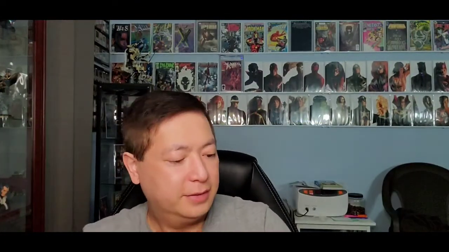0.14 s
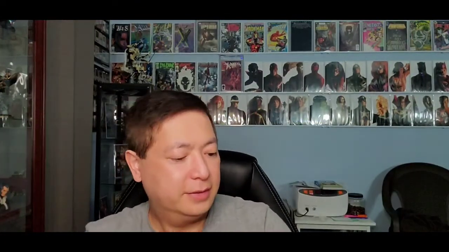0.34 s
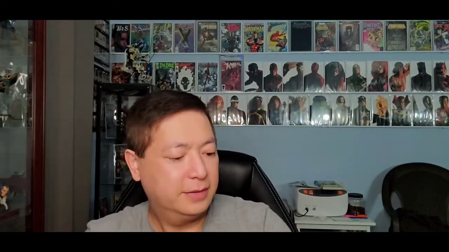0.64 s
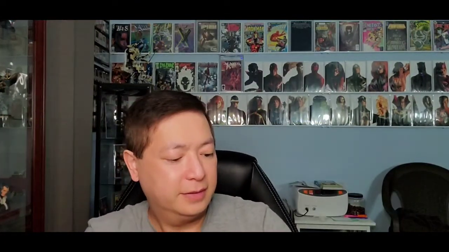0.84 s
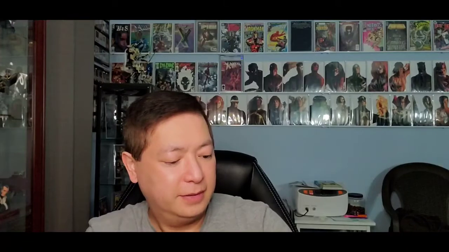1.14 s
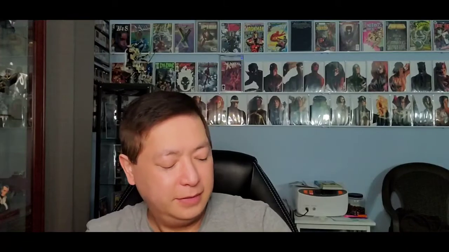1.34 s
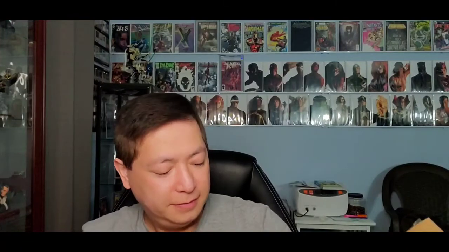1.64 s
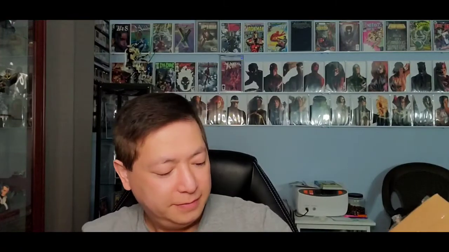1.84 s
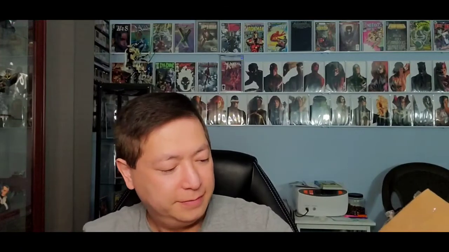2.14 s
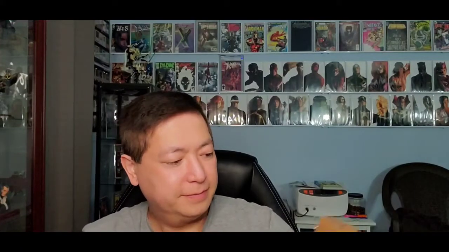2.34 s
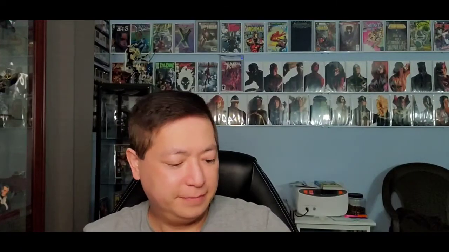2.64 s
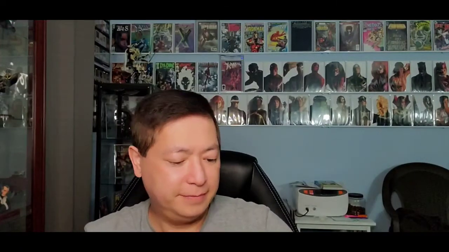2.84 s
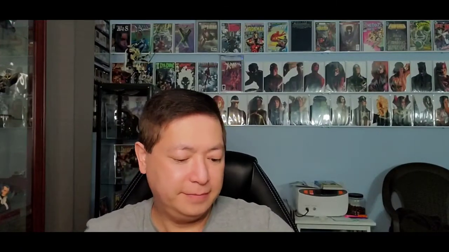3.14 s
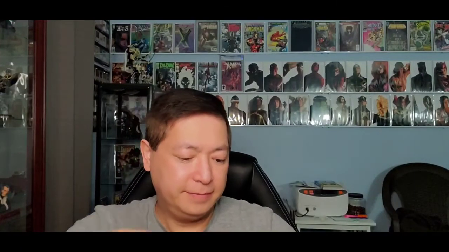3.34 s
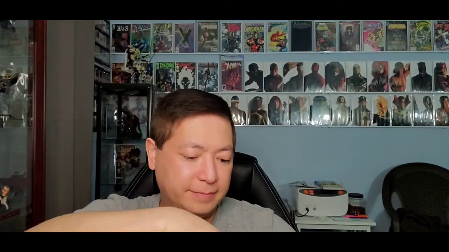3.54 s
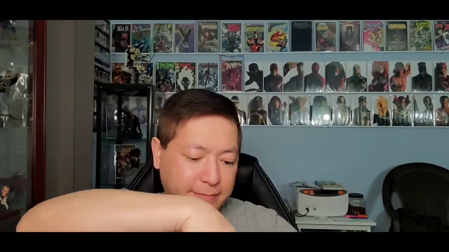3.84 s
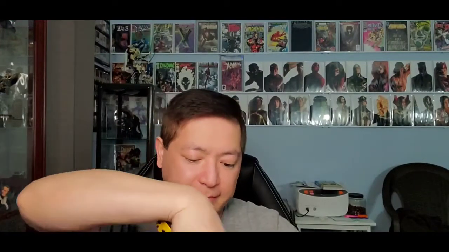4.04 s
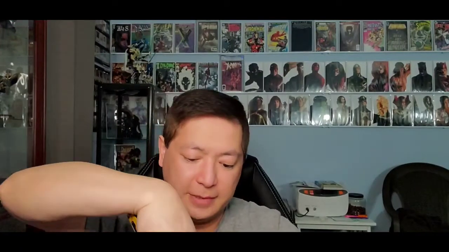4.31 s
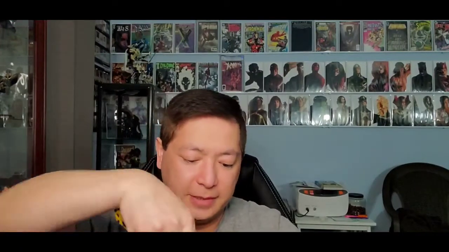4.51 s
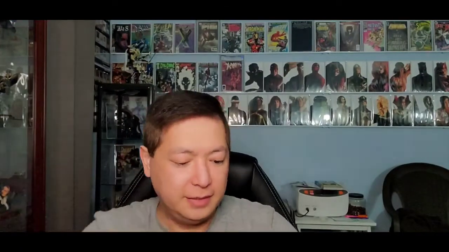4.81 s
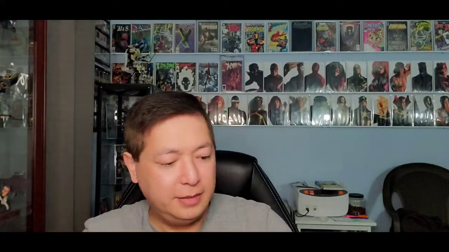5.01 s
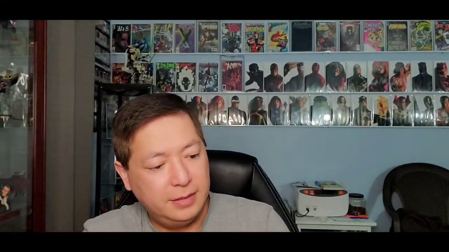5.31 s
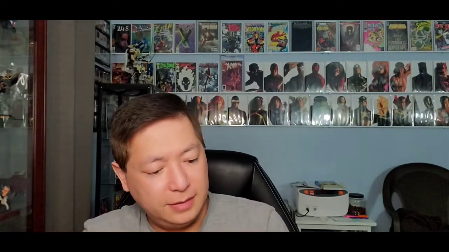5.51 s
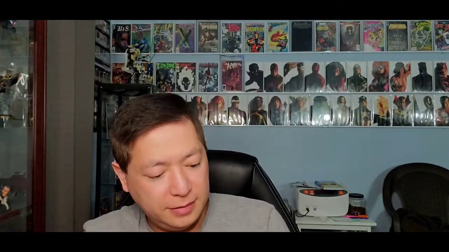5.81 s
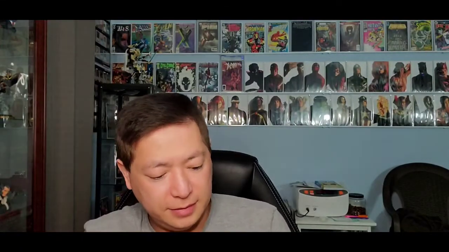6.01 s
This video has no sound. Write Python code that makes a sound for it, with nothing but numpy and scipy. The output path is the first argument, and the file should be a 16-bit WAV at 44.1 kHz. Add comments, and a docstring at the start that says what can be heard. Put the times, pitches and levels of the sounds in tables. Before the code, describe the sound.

Close, irregular scraping and snapping as a blade works through tape on a cardboard box, with short pauses over a low rumble.

```python
"""Cutting the tape on a box

A blade is worked through packing tape on a cardboard box, near two microphones in a quiet room.
Tape and blade snap and knock, so the card rings and the hollow box thumps. In between, blade and
hands rub and rasp as fibres catch and let go, and twice the tape slips with a squeak.
A low rumble and a faint hiss lie underneath."""
import sys
import numpy as np
from scipy import signal
from scipy.fft import rfft, irfft, next_fast_len
from scipy.io import wavfile

SR = 44100
rng = np.random.default_rng(int(sys.argv[2]) if len(sys.argv) > 2 else 0)


def pcm_store(signal):
    """Save signal as 16-bit PCM."""
    levels = np.round(np.clip(np.atleast_2d(signal), -1, 1) * 32767)
    wavfile.write(sys.argv[1], SR, levels.astype(np.int16).T)


N = 272004

# Tone of the rumble and hiss: (frequency [Hz], relative level [dB])
BACKGROUND_TONE = [(20, -25), (30, -23.5), (40, -10), (58, 4.5), (87, -14), (125, -18.5), (155, -14.5),
                   (217, -25.5), (280, -28), (384, -40.5), (1000, -47.5), (3000, -55), (7000, -64.5),
                   (10000, -61), (16000, -58)]
# How much the background differs between left and right: (frequency [Hz], unshared over shared [dB])
BACKGROUND_WIDTH = [(60, -19), (300, -13), (1000, -5), (4000, -1), (12000, -1)]
# Snaps and knocks; cavity, panel and film count from the flap's peak, the aftersound from each part's:
# (time [s], flap peak [dB], cavity [dB], panel [dB], film [dB], aftersound [dB], decay time [s],
# panel pitch [Hz])
SNAPS = [(0.231, -69.5, 16, 6.5, -2, -14, 0.51, 530), (0.369, -55, 5.5, -3.5, 12.5, -11, 0.37, 640),
         (0.628, -47.5, -7, -5.5, 12, -18.5, 0.47, 1310), (0.815, -51.5, -25, -15, 3, -16.5, 0.64, 622),
         (1.03, -36.5, -15, -10, 8, -17, 0.23, 625), (1.091, -28.5, -3.5, -8, 2.5, -15.5, 0.39, 660),
         (1.12, -38.5, 0, -7, 9, -8, 0.16, 1280), (1.376, -39, 1, 0.5, 0.5, -25, 0.49, 680),
         (2.055, -54.5, -4, -17, 12, -20.5, 0.18, 528), (2.075, -32.5, 0.5, -1, -1, -15, 0.47, 1250),
         (2.201, -34, 3, 5.5, -3, -15.5, 0.25, 770), (2.287, -47, 0.5, -1.5, -8, -24, 0.49, 507),
         (2.566, -69, -16, 5, -3, -11.5, 0.69, 1360), (2.61, -66.5, 13, -5, -2, -13, 0.85, 595),
         (2.688, -54, 11, -0.5, 14.5, -12.5, 0.36, 535), (2.719, -52, 0, -10, 1, -14.5, 0.32, 1300),
         (2.779, -54, -10, -9, 8.5, -13, 0.19, 1140), (2.845, -51, -10, -4, 1.5, -9.5, 0.33, 1430),
         (2.881, -53, -25, -4, 17.5, -23, 0.18, 711), (2.936, -33, -14, -4.5, -2, -19, 0.29, 1420),
         (3.127, -53.5, 6, 1, -1, -7, 0.44, 600), (3.169, -25.5, 1.5, 3.5, -10, -15.5, 0.29, 1130),
         (3.695, -43, 7.5, 0.5, -3, -13.5, 0.36, 844), (3.763, -51.5, -18, -26, 14, -21, 0.31, 740),
         (3.797, -47, -1, -17, 1, -24, 0.32, 452), (3.815, -41.5, 10.5, -35, -3.5, -11, 0.17, 452),
         (3.927, -56.5, 17.5, 7, -13, -13, 0.54, 516), (4.08, -37, -29, -22, 2.5, -9, 0.32, 1450),
         (4.093, -35.5, -27, 1.5, -3, -10, 0.56, 574), (4.109, -13, -9.5, -10, 1.5, -21, 0.29, 1370),
         (4.257, -23.5, -20.5, -16.5, -3, -22.5, 0.28, 1380), (4.418, -28.5, 2.5, -10, -1, -9, 0.29, 530),
         (4.448, -25, -2.5, -2, -14, -15, 0.34, 1070), (4.557, -40.5, -9, -15, 4.5, -35, 0.12, 953),
         (4.614, -57.5, 6.5, 5.5, -1, -7, 0.15, 779), (4.641, -48.5, -6, -2, -38, -22, 0.94, 1090),
         (4.762, -71, 13.5, -21, 20.5, -12, 0.93, 842), (5.017, -40.5, 0.5, 0, -1, -15.5, 0.66, 900),
         (5.151, -54, 11.5, 14, -9, -8.5, 0.32, 450), (5.241, -43, 5, -0.5, 6, -6, 0.21, 816),
         (5.356, -45, -6, 5, 1, -5.5, 0.29, 600), (5.379, -35, 7, 5.5, -13, -10.5, 0.26, 600),
         (5.437, -38.5, 5.5, 12.5, -16, -10.5, 0.22, 680), (5.467, -39.5, 6, 5, 4.5, -16.5, 0.26, 603),
         (5.641, -27, -8.5, 5.5, -20, -13.5, 0.34, 800), (5.793, -34.5, -26, 0, -14, -10.5, 0.27, 1330),
         (5.883, -42.5, 1, 8.5, -22, -17, 0.23, 800), (5.998, -36.5, -12, -5, -0.5, -17, 0.35, 1290),
         (6.122, -50.5, -19, 3.5, -7, -12, 1, 595)]
# Stereo width of a snap's aftersound: (flap [ratio], film [ratio], panel [ratio], cavity [ratio])
AFTERSOUND_WIDTH = (.7, .6, .55, .12)
# Modes are the pitches at which a part likes to ring: (pitch [Hz], width [Hz], level [dB])
FLAP_MODES = [(1850, 252, 5.5), (2040, 426, 2), (2600, 510, -1), (3100, 237, 1), (3800, 540, -4),
              (4400, 156, 3), (4690, 1400, -3)]   # blade and flap
FILM_MODES = [(5630, 660, -12.5), (9750, 1330, 4.5), (10680, 2800, 1.5), (14340, 4800, -5),
              (13600, 2500, -27)]   # tape film
PANEL_MODES = [(438, 19, 2.5), (530, 39, 2.5), (600, 34, 4), (680, 45, 2.5), (800, 65, 0.5),
               (1090, 148, -2.5), (1290, 71, 2), (1430, 81, -0.5)]   # card walls
CAVITY_MODES = [(88.7, 12.6, -10), (202.6, 41.2, -1), (258.8, 43.8, 1), (335.4, 75, -10.5)]   # desk and the air in the box
# Slow strokes of blade and hands:
# (firmest moment [s], build-up [s], let-go [s], panel [dB], cavity [dB], flap [dB], film [dB])
STROKES = [(0.668, 0.16, 0.092, -67, -58.5, -70.5, -81), (0.86, 0.072, .3, -60, -51.5, -59.5, -75),
           (1.0, 0.096, 0.29, -58, -66, -56.5, -58), (1.084, 0.072, 0.1, -36.5, -53, -43.5, -43.5),
           (1.239, 0.077, 0.23, -38.5, -66, -42, -52.5), (1.32, 0.13, 0.17, -58, -48.5, -59, -79),
           (1.58, .12, 0.056, -83, -84, -82, -76), (2.22, 0.1, 0.084, -85, -48.5, -68, -86),
           (2.7, 0.04, 0.17, -61, -68, -76, -90), (2.858, 0.059, .2, -65, -60, -62.5, -65),
           (2.974, 0.16, 0.13, -63.5, -61, -67, -65), (3.112, 0.062, 0.23, -80, -73, -66, -67),
           (3.183, 0.082, 0.13, -50.5, -63, -56, -55), (3.868, 0.079, 0.02, -95, -51.5, -80, -68),
           (3.95, 0.027, 0.26, -63, -58, -63, -58.5), (4.028, 0.1, 0.092, -53.5, -50.5, -49.5, -56),
           (4.144, 0.054, 0.092, -37.5, -38.5, -40.5, -40), (4.3, 0.31, 0.12, -64, -58.5, -57.5, -56),
           (4.444, 0.084, 0.12, -38.5, -52, -42, -44), (4.851, 0.16, 0.13, -61.5, -63.5, -58, -59.5),
           (5.08, 0.1, 0.33, -58, -86, -55.5, -51.5), (5.248, 0.23, 0.094, -56, -75, -51, -74),
           (5.35, 0.046, 0.33, -58.5, -46, -61, -65), (5.581, 0.077, 0.057, -58, -63, -66.5, -72),
           (5.742, 0.1, 0.14, -58, -47.5, -56, -59.5), (5.856, 0.26, 0.017, -49, -51, -70, -64.5),
           (6.044, 0.19, 0.12, -48, -50.5, -51, -58)]
# Short rasps of the blade tip: (middle [s], half length [s], panel [dB], cavity [dB], flap [dB],
# film [dB], panel pitch [Hz], flap pitch [Hz])
RASPS = [(0.656, 0.031, -58.5, -68, -74, -87, 1310, 1990), (0.573, 0.05, -70, -85, -82, -98, 1300, 2020),
         (0.73, 0.05, -72, -84, -66.5, -86, 1280, 2600), (0.891, 0.069, -45.5, -40.5, -56, -62, 1420, 3130),
         (1.093, 0.11, -40.5, -37, -46, -41, 603, 2810), (1.253, 0.16, -38, -50, -52, -67, 1090, 2600),
         (1.276, 0.15, -44.5, -40, -62, -59, 680, 3000), (1.355, 0.052, -40, -33, -57, -77, 704, 2600),
         (2.15, 0.073, -40.5, -47.5, -50, -74, 800, 3400), (2.316, 0.21, -71, -64, -68.5, -84, 1280, 1850),
         (2.643, 0.08, -69, -84, -65, -71, 1280, 3800), (4, 0.037, -67, -69, -58.5, -57, 800, 3100),
         (4.412, 0.093, -48, -62, -43.5, -63, 700, 3800), (4.424, 0.055, -38.5, -52, -61, -45, 800, 4400),
         (4.46, 0.017, -61, -49, -61, -44, 1180, 2000), (4.524, 0.064, -40, -42, -41, -43.5, 800, 3100),
         (4.851, 0.23, -61, -83, -55, -71, 800, 3350), (5.192, 0.04, -64, -67, -43.5, -46.5, 1300, 4060),
         (5.244, 0.038, -33, -64, -34.5, -39.5, 716, 4400), (5.301, 0.17, -64, -65, -65, -83, 1300, 4670),
         (5.448, 0.076, -34.5, -67, -55, -72, 740, 1950), (5.672, 0.079, -34.5, -47, -39, -50, 580, 1930),
         (5.701, 0.064, -62, -50, -35.5, -45, 704, 2780),
         (5.801, 0.089, -52.5, -47.5, -42.5, -48.5, 1170, 3420),
         (6.068, 0.34, -58.5, -56, -53.5, -74, 1190, 2330)]
# Slips of the tape: (start [s], length [s], first pitch [Hz], last pitch [Hz], level [dB])
SQUEAKS = [(4.645, 0.12, 1700, 2000, -62.5), (5.255, 0.074, 4800, 4340, -50)]
# How much louder the left microphone is: (frequency [Hz], left over right [dB])
LEFT_LOUDER = [(60, -1), (200, -1), (380, -2), (700, .7), (1300, 2.5), (2400, 2.8), (4400, 3.5),
               (6000, 2.5), (8000, -2.5), (10000, -3.5), (12500, 1.5), (15500, 2.5)]
# How far the nearer, left microphone is ahead: (frequency [Hz], phase [radians])
LEFT_AHEAD = [(100, .05), (500, .5), (1290, 1.15), (2400, 1.3), (4300, 1.75), (8500, 1.95), (12000, 1.55),
              (16000, 1.5)]
# How long the room's echo takes to fall by 60 dB: (frequency [Hz], time [s])
ROOM_DECAY = [(200, 0.18), (1000, 0.17), (4000, 0.14), (12000, 0.31)]


def amp(db):
    """Turn decibels into a number to multiply by."""
    return 10 ** (np.asarray(db) / 20)


def rms_one(x):
    """Scale a signal to an average strength (rms) of 1."""
    return x / np.sqrt(np.mean(x ** 2) + 1e-20)


def at_hz(table, hz):
    """Read between a table's rows, with octaves evenly spaced."""
    table_hz, values = np.transpose(table)
    return np.interp(np.log(hz + 1), np.log(table_hz), values)


def ring(x, modes):
    """Let x shake a part of the box: every mode rings, and they add with alternating signs."""
    out = 0
    for k, (hz, width_hz, level_db) in enumerate(modes):
        r = np.exp(-np.pi * width_hz / SR)
        feedback = [1, -2 * r * np.cos(2 * np.pi * hz / SR), r * r]
        ringing = signal.lfilter([1, 0, -1], feedback, x + 1e-18) * (1 - r * r) / 2
        out = out + (-1) ** k * amp(level_db) * ringing
    return out


def touched(modes, touch_hz, lightness):
    """Touching one spot wakes the modes near its pitch most, the more so for a light touch."""
    return [(hz, width_hz, level_db - lightness * 6.0 * np.log2(hz / touch_hz) ** 2)
            for hz, width_hz, level_db in modes]


def drift(rate_hz):
    """A smooth random wander, about 1 in size."""
    r = np.exp(-2 * np.pi * rate_hz / SR)
    wander = signal.lfilter([1], [1, -2 * r, r * r], rng.standard_normal(N + SR // 10))
    return rms_one(wander[SR // 10:])


def background():
    """The building rumbles and the recorder hisses; left and right are alike in the bass."""
    size = next_fast_len(N)
    hz = np.fft.rfftfreq(size, 1 / SR)
    spectra = rfft(rng.standard_normal((2, size))) * amp(at_hz(BACKGROUND_TONE, hz))
    spectra[1] *= amp(at_hz(BACKGROUND_WIDTH, hz))
    shared, side = irfft(spectra, size)[:, :N]
    return amp(-54.5) * (shared * amp([[-.4], [.4]]) + side * [[1], [-1]]) / np.std(shared)


def snaps():
    """A tiny burst cracks and sets the box ringing; an aftersound of rustle and echoes follows."""
    card_burst_s, film_burst_s = .0024, .0028
    out, noises = np.zeros((2, N + SR // 3)), rng.standard_normal((len(SNAPS), 3, SR // 3))
    for snap, noise in zip(SNAPS, noises):
        time_s, flap_db, cavity_db, panel_db, film_db, after_db, decay_s, panel_hz = snap
        at, size = round(time_s * SR), int(np.clip(decay_s, .1, .3) * SR)
        t, noise = np.arange(size) / SR, noise[:, :size]
        card_burst = noise[0] * np.exp(-(t / card_burst_s) ** 2)
        film_burst = noise[0] * np.exp(-(t / film_burst_s) ** 2)
        push = np.exp(-((t - .003) / .00087) ** 2)   # the whole wall gives way once, a moment late
        flap_hz = 2920 * 2 ** (.03 * film_db)   # more film in a snap wakes higher flap modes
        parts = [(card_burst, touched(FLAP_MODES, flap_hz, lightness=1.24), 0, decay_s),
                 (film_burst, FILM_MODES, film_db, .55 * decay_s),   # the film dies away sooner
                 (card_burst, touched(PANEL_MODES, panel_hz, lightness=.94), panel_db, decay_s),
                 (push, CAVITY_MODES, cavity_db, decay_s)]
        for (drive, modes, part_db, fade_s), width in zip(parts, AFTERSOUND_WIDTH):
            crack = ring(drive, modes)
            crack /= np.abs(crack).max()
            shared, side = rms_one(ring(noise[1:], modes))
            rustle = shared + width * side * [[1], [-1]]
            onset, gone = np.minimum(t / .005, 1), t / max(fade_s, .03)
            fade = amp(after_db - 60 * gone - 12.5 * gone ** 3)   # falls faster near its end
            out[:, at:at + size] += amp(flap_db + part_db) * (crack + onset * fade * rustle)
    return out[:, :N]


def grains(per_s, spread_db, clump_db):
    """Fibres catch and let go: random clicks of uneven size that come in clumps."""
    sizes = amp(spread_db * np.minimum(rng.exponential(1, N), 4)) * rng.choice([-1, 1], N)
    caught = rng.random(N) < per_s / SR
    return sizes * caught * amp(clump_db * drift(rate_hz=26.5))


def stroke_levels():
    """Each part's loudness as the pressure grows to a stroke's firmest moment, then slackens."""
    firmest_s, build_s, let_go_s, *levels_db = np.transpose(STROKES)
    t = np.arange(0, N, 32) / SR
    late_s = t - firmest_s[:, None]
    away = np.where(late_s < 0, -late_s / build_s[:, None], late_s / let_go_s[:, None])
    pressure = amp(-25 * away ** 1.5)   # 25 dB down at both ends of a stroke
    powers = amp(levels_db) ** 2 @ pressure ** 2   # overlapping strokes add their power
    return [np.interp(np.arange(N) / SR, t, np.sqrt(power)) for power in powers]


def rubbing():
    """Blade and hands slide over the card: streams of tiny clicks shake every part of the box."""
    panel, cavity, flap, film = stroke_levels()
    coarse = grains(per_s=2500, spread_db=3, clump_db=2.5)
    fine = grains(per_s=5000, spread_db=0, clump_db=2)
    low = panel * rms_one(ring(coarse, PANEL_MODES)) + cavity * rms_one(ring(coarse, CAVITY_MODES))
    high = flap * rms_one(ring(fine, FLAP_MODES)) + film * rms_one(ring(fine, FILM_MODES))
    return low + high


def rasps():
    """The blade tip drags: a short swell of coarse clicks wakes fewer modes than a knock does."""
    ring_out_s = .06
    out, catches = np.zeros(N), grains(per_s=1200, spread_db=3.5, clump_db=3.5)
    for middle_s, half_s, panel_db, cavity_db, flap_db, film_db, panel_hz, flap_hz in RASPS:
        at = round((middle_s - half_s) * SR)
        size = min(round((2 * half_s + ring_out_s) * SR), N - at) - 1
        clicks = catches[at:at + size]
        swell = np.exp(-(3.83 * (np.arange(size) / SR / half_s - 1)) ** 2)
        parts = [(panel_db, touched(PANEL_MODES, panel_hz, lightness=3.5)), (cavity_db, CAVITY_MODES),
                 (flap_db, touched(FLAP_MODES, flap_hz, lightness=5)), (film_db, FILM_MODES)]
        for level_db, modes in parts:
            steady = ring(clicks, modes)
            out[at:at + size] += amp(level_db) * ring(clicks * swell, modes) / np.std(steady)
    return out


def squeaks():
    """Tape slips on card: rough, gliding tones that start at once and fade."""
    out, fade_db = 0, 9
    flutter_db = 3.1 * drift(rate_hz=120)
    wobble = 1 + .015 * drift(rate_hz=149)
    for start_s, length_s, first_hz, last_hz, level_db in SQUEAKS:
        done = np.clip((np.arange(N) / SR - start_s) / length_s, 0, 1)
        gate = np.minimum(20 * np.minimum(done, 1 - done), 1)
        hz = (first_hz + (last_hz - first_hz) * done) * wobble
        tone = np.sin(2 * np.pi * np.cumsum(hz) / SR)
        out = out + gate * amp(level_db - fade_db * done + flutter_db) * tone
    return out


def microphones(x):
    """Sound straight from the box reaches the two microphones with different tone and timing."""
    size = next_fast_len(N)
    hz = np.fft.rfftfreq(size, 1 / SR)
    left = amp(at_hz(LEFT_LOUDER, hz) / 2)
    right = np.exp(-1j * at_hz(LEFT_AHEAD, hz)) / left
    return irfft(rfft(x, size) * [left, right], size)[:, :N]


def room(x):
    """The walls echo: a tail of noise in which each octave dies away at its own speed."""
    t, tail = np.arange(SR // 2) / SR, 0
    shared, own = rng.standard_normal(len(t)), rng.standard_normal((2, len(t)))
    for hz in 125 * 2 ** np.arange(7):
        alike = min(400 / hz, .98)   # long waves reach both microphones alike
        noise = alike * shared + np.sqrt(1 - alike ** 2) * own
        top_hz = hz * 2 ** .5 if hz < 8000 else .45 * SR
        band = signal.butter(1, [hz / 2 ** .5, top_hz], "band", fs=SR, output="sos")
        tail = tail + signal.sosfilt(band, noise) * amp(-60 * t / at_hz(ROOM_DECAY, hz))
    tail *= np.clip(t / .0066 - 1, 0, 1)   # the first walls answer after a few ms
    tail /= np.sqrt(np.sum(tail ** 2) / 2)
    return signal.fftconvolve(x[None], tail, axes=1)[:, :N]


def scene():
    """Snaps and sliding sounds over the background; the sliding also echoes in the room."""
    sliding = rubbing() + rasps() + squeaks()
    direct = microphones(snaps() + amp(-4) * sliding)
    return direct + amp(-13) * room(sliding) + background()


def record(dry):
    """A steep filter cuts off the highest treble."""
    cutoff_hz = 15850
    return signal.sosfilt(signal.ellip(10, .5, 60, cutoff_hz, fs=SR, output="sos"), dry)


dry = scene()
out = record(dry)
pcm_store(out)
```